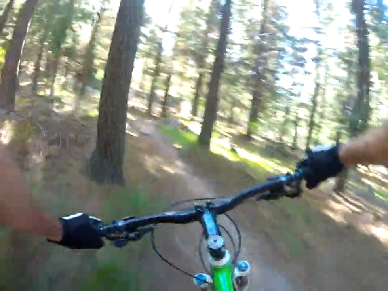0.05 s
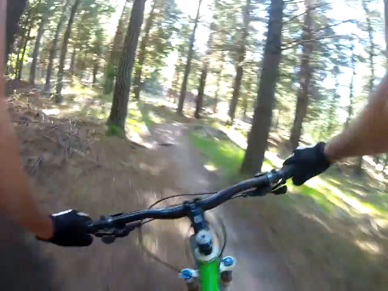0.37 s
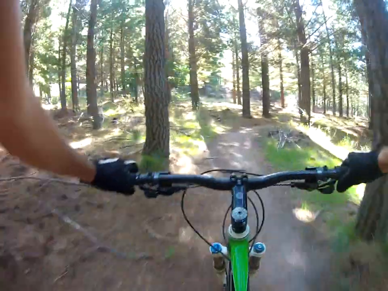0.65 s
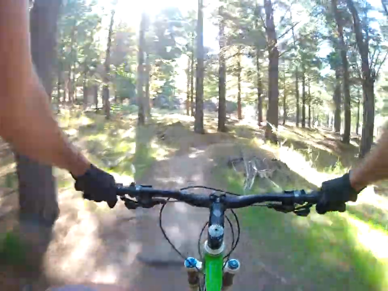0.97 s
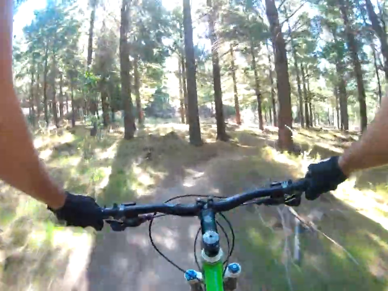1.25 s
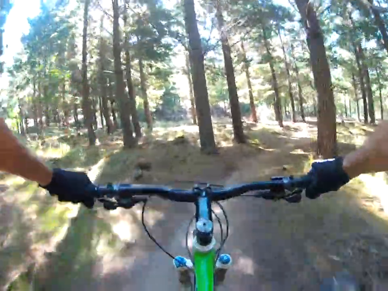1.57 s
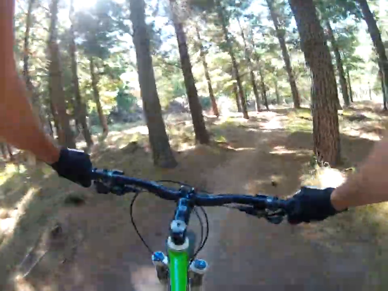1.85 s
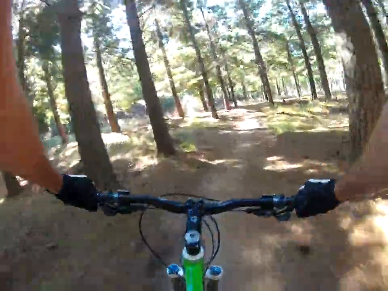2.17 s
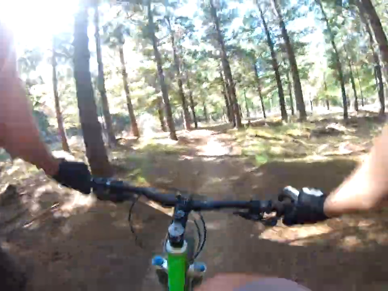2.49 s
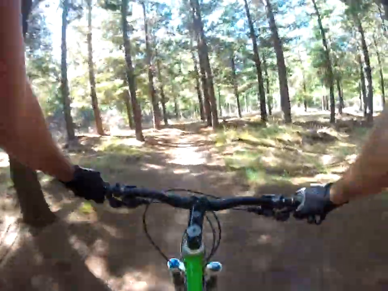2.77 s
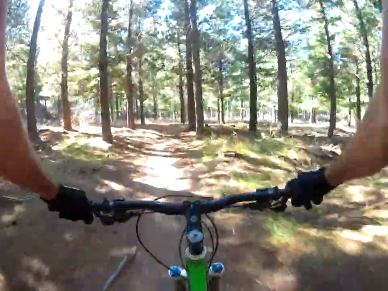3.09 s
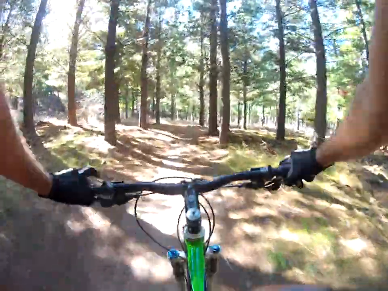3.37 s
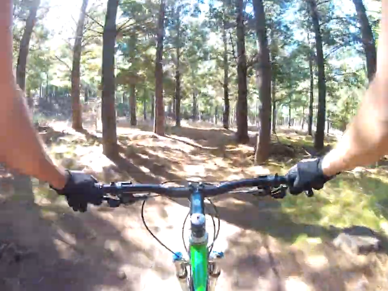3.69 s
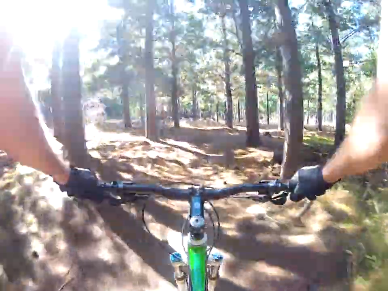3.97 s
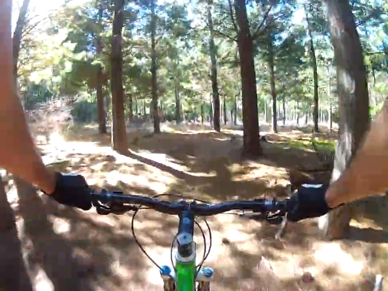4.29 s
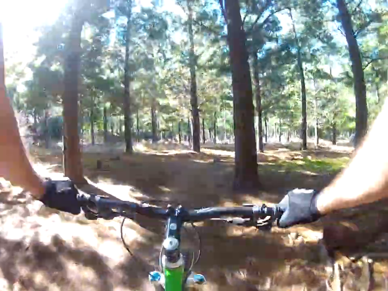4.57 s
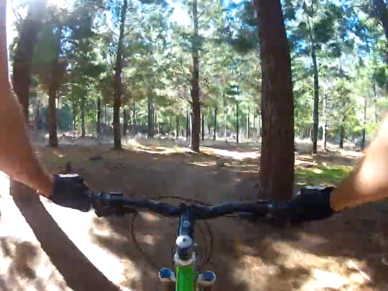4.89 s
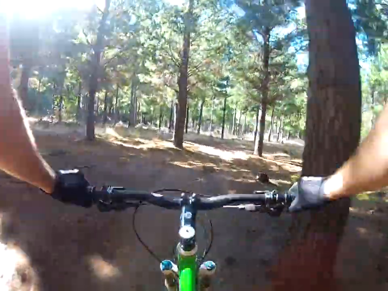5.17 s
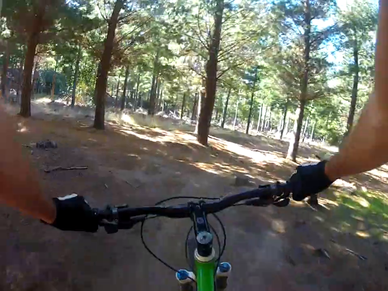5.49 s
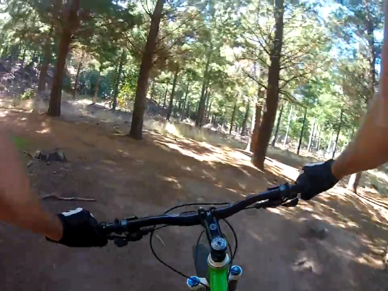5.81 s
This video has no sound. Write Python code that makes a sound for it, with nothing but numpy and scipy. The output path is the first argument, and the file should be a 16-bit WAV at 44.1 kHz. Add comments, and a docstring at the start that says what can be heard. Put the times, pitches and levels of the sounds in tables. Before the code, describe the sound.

Low, gusty wind pushes on a chest-mounted microphone while the knobbly tyres of a mountain bike drum and softly crunch along a dirt trail in a forest. Early bumps thump and shake the chain, followed by light ticks of links and cables. Midway comes a single sharp clack on the frame and a brief lull in the rumble, then more jolts and a louder chain slap as the ride carries on.

```python
"""Wind and a low tyre rumble come first: a mountain bike runs fast down a dirt forest trail, heard
from a cased camera on the rider's chest. Swirling air pushes on the case, the tread crunches over
soil and grit, and the tyre knobs drum on uneven ground. Bumps thump through the camera mount.
Chain and cables tick and rattle, and once something hard clacks against the frame."""
import sys
import numpy as np
from scipy.fft import rfft, irfft, next_fast_len
from scipy.io import wavfile
from scipy.ndimage import map_coordinates

SR = 44100
rng = np.random.default_rng(int(sys.argv[2]) if len(sys.argv) > 2 else 0)


def dump(signal):
    """Clip the signal to [-1, 1] and save it as 16-bit WAV at the path in sys.argv[1]."""
    limited = np.clip(np.atleast_2d(signal).T, -1, 1)
    pcm = np.round(limited * 32767).astype(np.int16)
    wavfile.write(sys.argv[1], SR, pcm)


N = 257544


def amp(db):
    """Turn decibels into a number to multiply by."""
    return 10 ** (np.asarray(db) / 20)


def unit(x):
    """Scale a sound so that its average strength (rms) is 1."""
    return x / np.sqrt(np.mean(x ** 2) + 1e-20)


def curve(rows):
    """Join (time, value) points with straight lines, one value per sample."""
    times, values = np.transpose(rows)
    return np.interp(np.arange(N) / SR, times, values)


def swell(s, length):
    """A smooth rise to 1 and fall, centred on s seconds."""
    return np.exp(-((np.arange(N) / SR - s) / length) ** 2)


def wobble(rate):
    """A smooth curve through `rate` random points a second."""
    points = rng.standard_normal(int(N * rate / SR) + 4)
    return map_coordinates(points, [np.arange(N) * rate / SR])


def grains(rate, spread_db):
    """About `rate` tiny hits a second, of very unequal size."""
    hits = (rng.random(N) < rate / SR) * rng.standard_normal(N)
    return unit(hits * amp(spread_db * np.clip(rng.standard_normal(N), -2, 2)))


def filtered(x, response):
    """Multiply each frequency in x by response(frequency)."""
    size = 2 * next_fast_len(N // 2 + 8192)
    return irfft(rfft(x, size) * response(np.fft.rfftfreq(size, 1 / SR)), size)[:N]


def colour(x, *tones):
    """Make pitches louder or softer, following tables of f/Hz, level/dB."""
    def response(hz):
        db = sum(np.interp(np.log(hz + 1), np.log([f for f, _ in tone]), [d for _, d in tone])
                 for tone in tones)
        cepstrum = irfft(np.log(amp(db)))
        half = len(cepstrum) // 2
        one_sided = np.r_[1, np.full(half - 1, 2), np.zeros(half)]  # ring after a hit, never before
        return np.exp(rfft(cepstrum * one_sided))
    return filtered(x, response)


# How well each pitch gets through the camera case: f/Hz, level/dB
CASE_TONE = [(1250, -3.5), (2100, -3), (2450, -4.5), (2950, -0.5), (3500, -6.5), (3950, -2.5), (4800, -10),
             (5750, -28.5), (6250, -28.5), (7950, -6.5), (8550, -15.5), (9050, -9.5), (10700, -18.5),
             (13400, -16), (15000, -13.5)]
def through_case(x, *tones):
    """Give a sound its tone, then let the case muffle its treble."""
    return colour(x, *tones, CASE_TONE)


# The deep tone of wind on the case: f/Hz, level/dB
WIND_TONE = [(12, -25.5), (25, -14), (45, -1.5), (65, -2.5), (100, -2), (140, -8.5), (250, -22.5),
             (2000, -120)]
def wind(shake_db, press, lumps_db=1.0):
    """Air swirls off the rider and pushes on the case in lumps, harder on rough ground and jolts."""
    level_db = -24.5 + 0.53 * shake_db + 2.5 * press
    buffet = colour(rng.standard_normal(N), WIND_TONE)
    return amp(level_db) * unit(buffet * amp(lumps_db * wobble(24)))


# The tones of crushed soil and of fine grit: f/Hz, level/dB
SOIL_TONE = [(400, 3.5), (900, -0.5), (2000, 1.5), (3000, 1), (4200, -12.5), (7000, -1.5), (15000, -7.5)]
GRIT_TONE = [(1500, -19), (3000, -10.5), (4000, 4), (8000, -1), (15000, -1.5)]
# How each grows and fades along the trail: t/s, level/dB
SOIL_LEVELS = [(0.0, -47.5), (0.16, -49.5), (0.32, -51.5), (0.88, -54), (1.35, -53), (1.56, -55.5),
               (2.34, -52.5), (2.62, -51), (3.04, -54.5), (4.29, -55.5), (4.54, -54), (5.84, -53.5)]
GRIT_LEVELS = [(0.0, -50.5), (0.16, -52.5), (0.62, -57.5), (0.8, -57), (1.07, -61), (1.25, -53),
               (1.66, -60), (1.95, -54.5), (2.41, -54.5), (3.71, -60.5), (5.3, -56), (5.84, -56)]
def dirt(soil_gain_db=2.5, grit_gain_db=0.8, patchy_db=1.08):
    """The tread crushes soil and flicks fine grit: tiny hits over a steady rush."""
    patches = amp(patchy_db * wobble(55))
    soil = through_case(rng.standard_normal(N) + 0.54 * grains(1000, spread_db=1), SOIL_TONE)
    grit = through_case(rng.standard_normal(N) + 0.72 * grains(600, spread_db=2), GRIT_TONE)
    soil = amp(curve(SOIL_LEVELS) + soil_gain_db) * unit(soil)
    grit = amp(curve(GRIT_LEVELS) + grit_gain_db) * unit(grit)
    return patches * (soil + grit)


# The pitches at which the chain rings: f/Hz, width/Hz, level/dB
CHAIN_RINGS = [(2990, 200, -5.5), (3930, 630, -5.5), (7400, 790, -5), (8400, 130, -9)]
def chain_ring(shaking):
    """Shaken metal links ring at a few pitches of their own."""
    def response(f):
        return sum(amp(db) * 1j * f * width / (hz * hz - f * f + 1j * f * width)
                   for hz, width, db in CHAIN_RINGS)
    return filtered(shaking, response)


# The chain slaps the frame: t/s, level/dB, length/s, knock gain/dB
CHAIN_SLAPS = [(.349, -30.5, 0.0045, 10.5), (.43, -24.5, 0.0062, 8.5), (.443, -34.5, 0.019, 4),
               (.466, -29, 0.011, 8), (.481, -25.5, 0.013, 3.5), (.504, -25, 0.0087, 3),
               (.544, -32.5, .008, 6), (.672, -39, 0.036, 3), (3.033, -30, .004, 3),
               (3.549, -37.5, 0.0037, 9.5), (3.59, -38.5, .004, 6), (4.508, -39.5, .045, 6.5),
               (4.554, -21.5, 0.0079, 2.5), (4.561, -16.5, 0.0064, 3.5), (4.572, -22, 0.0083, 8.5),
               (5.567, -25.5, .013, 1)]
# Links and cables tick lightly: t/s, level/dB
LIGHT_TICKS = [(0.4003, -30), (0.4122, -33.5), (0.5764, -37), (1.613, -36), (1.754, -34.5), (1.822, -34.5),
               (1.8433, -34.5), (1.901, -37), (2.1286, -37), (2.2538, -32.5), (2.3082, -35), (2.3715, -49),
               (2.4955, -36.5), (4.8419, -40.5), (5.746, -36)]
# The dull tone of a knock on the frame: f/Hz, level/dB
KNOCK_TONE = [(150, -14.5), (370, 23.5), (700, 12.5), (1100, -1), (2700, 0.5), (4000, -2.5), (10000, -31.5)]
def rattles(stones_per_s=5, rise_s=0.0008, settle_s=0.046):
    """Chain, cables and flicked stones hit the bike: each hit rings, clicks and knocks the frame."""
    # ticks and random stones get the same four columns as the slaps
    ticks = [(s, db + 3.5, 0.0092, -3) for s, db in LIGHT_TICKS]
    draws = rng.random((round(stones_per_s * N / SR), 2))
    stones = [(when * N / SR, -43 + 3.5 * (2 * size - 1), 0.0051, 6) for when, size in draws]
    bright, heavy, t = np.zeros(N), np.zeros(N), np.arange(SR // 8) / SR
    settle = amp(-22.5) * np.exp(-(t / settle_s) ** 2)  # the links chatter on after each hit
    for s, db, length, knock_db in list(CHAIN_SLAPS) + ticks + stones:
        burst = amp(db) * (1 - np.exp(-t / rise_s)) * (np.exp(-(t / length) ** 2) + settle)
        add(bright, s, burst)
        add(heavy, s, burst * amp(knock_db))
    chatter = unit(rng.standard_normal(N) + 0.79 * grains(1400, spread_db=0))
    ring = amp(5) * chain_ring(bright * rng.standard_normal(N))
    clicks = amp(-0.5) * colour(bright * chatter, GRIT_TONE)
    knocks = amp(-3) * colour(heavy * chatter, KNOCK_TONE)
    return through_case(ring + clicks + knocks)


def add(track, s, sound):
    """Mix a sound into the track at s seconds."""
    part = track[round(s * SR):][:len(sound)]
    part += sound[:len(part)]


# The pitches at which the frame rings: f/Hz, level/dB, time to fade by 60 dB/s
FRAME_RINGS = [(667, 8.5, 0.016), (2090, -5.5, 0.044), (3110, 0, 0.012), (8930, -7.5, 0.011),
               (9800, -16, 0.037), (14090, -13, .033)]
# The tone of the sharp crack: f/Hz, level/dB
CRACK_TONE = [(800, -1), (1200, -6), (2600, -1.5), (3400, -3), (4500, -22), (7500, -15.5),
              (10500, -0.5), (15000, -1)]
def clack(at_s=2.7815, rise_s=0.00037, crack_fade_s=0.017):
    """Something hard hits the frame once: a crack, then a short ring."""
    ring, crack, t = np.zeros(N), np.zeros(N), np.arange(SR // 8) / SR
    notes = sum(amp(db - 60 * t / fade) * np.sin(2 * np.pi * hz * t) for hz, db, fade in FRAME_RINGS)
    add(ring, at_s, notes * (1 - np.exp(-t / rise_s)))
    add(crack, at_s, amp(-60 * t / crack_fade_s) * rng.standard_normal(len(t)))
    return amp(-18) * ring + amp(-9) * through_case(crack, CRACK_TONE)


# Jolts that come through the camera mount: t/s, level/dB, push length/s
JOLTS = [(0.345, -7, 0.0021), (0.5477, -8.5, 0.0022), (2.832, -4, 0.0051), (3.703, -6, .004),
         (3.7345, -8.5, 0.0038), (4.574, -17, 0.0037), (4.815, -6, 0.0041), (4.8602, -4.5, 0.00317),
         (5.211, -4.5, 0.0031), (5.242, -14, 0.0063)]
def bumps(rebound=0.39):
    """Each jolt thumps the case with one push and a slower, weaker swing back."""
    thumps, t = np.zeros(N), np.arange(SR // 20) / SR
    for s, db, length in JOLTS:
        progress = t / length
        push = np.sin(np.pi * np.clip(progress, 0, 1)) ** 2
        back = np.sin(np.pi * np.clip((progress - 0.7) / 1.55, 0, 1)) ** 2
        add(thumps, s, amp(db) * (rebound * back - push))
    return thumps


# How hard the uneven ground shakes the tyres: t/s, level/dB
ROUGHNESS = [(0, -25), (.24, -14), (.54, -20.5), (.66, -16), (.96, -20), (1.12, -20), (1.4, -27),
             (1.92, -22.5), (2.4, -24), (2.7, -19.5), (3.02, -26), (3.38, -19.5), (3.9, -22.5),
             (4.4, -20.5), (5.3, -25), (5.46, -35.5), (5.84, -26.5)]
# Small rises where the wheels go light: t/s, drop in level/dB
TRAIL_CRESTS = [(2.3, 5), (2.95, 11), (3.27, 6.5), (5.12, 1.5)]
def ground_shake(usual_db=-21.5, crest_s=0.055):
    """Shaking in dB above or below ordinary trail; it eases over each crest."""
    lift_db = sum(db * swell(s, crest_s) for s, db in TRAIL_CRESTS)
    return curve(ROUGHNESS) - lift_db - usual_db


# The tones of the tyres' low rumble and the tread's higher roar: f/Hz, level/dB
RUMBLE_TONE = [(60, -31.5), (110, -1.5), (155, 0.5), (240, -2), (330, -9.5), (480, -18.5), (3000, -120)]
ROAR_TONE = [(180, -14), (330, 2), (420, 0.5), (540, -1.5), (670, -5.5), (800, -16.5), (1000, -26.5),
             (1500, -48.5), (5000, -120)]
# How the roar grows and fades along the trail: t/s, level/dB
ROAR_LEVELS = [(0.0, -35), (0.41, -34.5), (1.58, -42.5), (1.87, -36.5), (2.16, -42.5), (2.6, -38.5),
               (3.04, -41.5), (3.63, -39), (4.03, -41), (4.68, -39), (5.53, -44.5), (5.84, -47.5)]
def tyres(shake_db, press, roar_gain_db=2.5, judder_db=1.5):
    """Rubber knobs strike the ground; the changing weight on the wheels makes the sound tremble."""
    weight = amp(judder_db * wobble(55))
    rumble = unit(weight * colour(grains(3500, spread_db=1.7), RUMBLE_TONE))
    roar = unit(weight * colour(grains(2200, spread_db=0), ROAR_TONE))
    rumble_db = -26 + shake_db + 2.5 * press
    roar_db = curve(ROAR_LEVELS) + roar_gain_db + 0.17 * shake_db + 1.5 * press
    return amp(rumble_db) * rumble + amp(roar_db) * roar


def scene():
    """All that reaches the camera; rough ground and jolts swell the wind and tyres together."""
    shake_db = ground_shake()
    press = np.max([swell(s, 0.028) for s, _, _ in JOLTS], axis=0)  # jolts press the bike down: 0 to 1
    mix = wind(shake_db, press) + tyres(shake_db, press) + dirt() + bumps() + rattles() + clack()
    return mix[None]


def record(dry, sizzle_hz=12000, bass_cut_hz=480, top_hz=15300):
    """The camera's change of sample rate copies the rumble up high as a faint sizzle; the top is cut."""
    sound = dry[0]
    low = filtered(sound, lambda hz: 1j * hz / (bass_cut_hz + 1j * hz) * (hz < sizzle_hz / 10))
    sizzle = amp(-21) * low * np.sin(2 * np.pi * sizzle_hz * np.arange(N) / SR)
    return filtered(sound + sizzle, lambda hz: hz < top_hz)[None]


dry = scene()
out = record(dry)
dump(out)
```